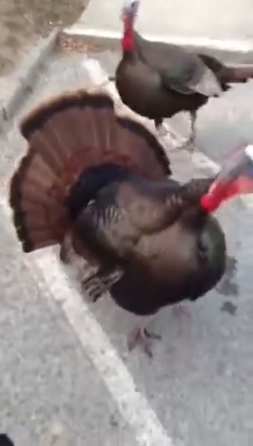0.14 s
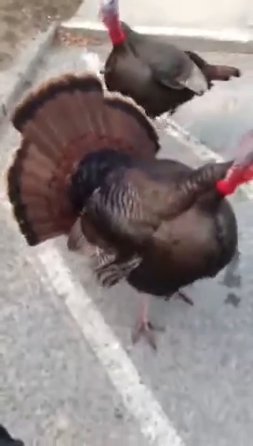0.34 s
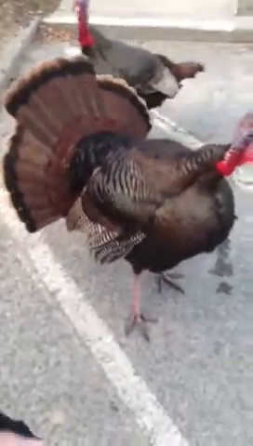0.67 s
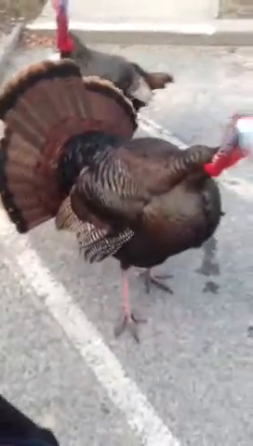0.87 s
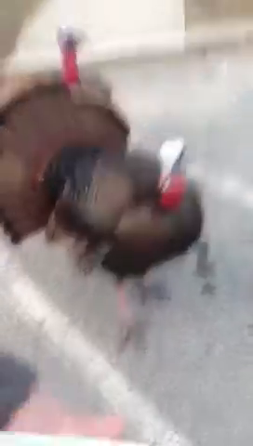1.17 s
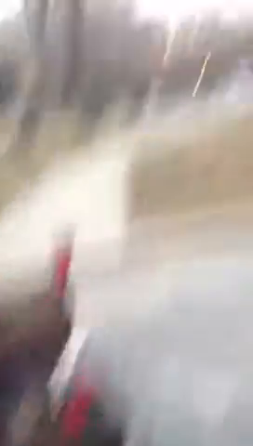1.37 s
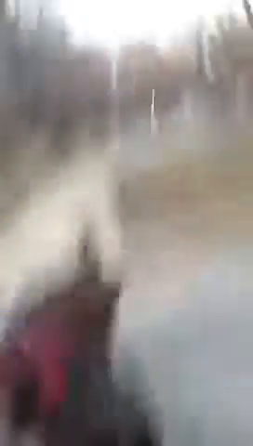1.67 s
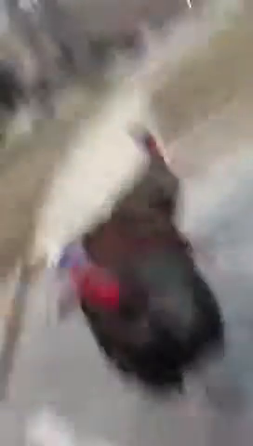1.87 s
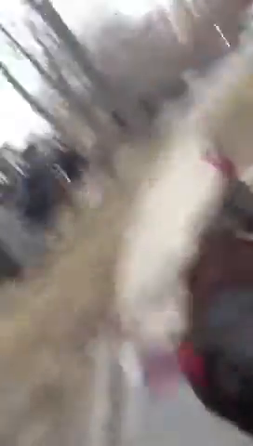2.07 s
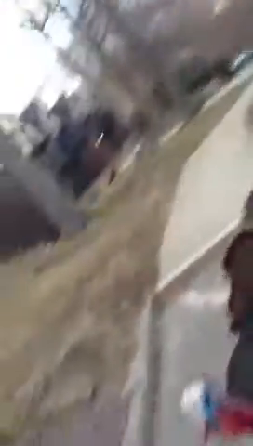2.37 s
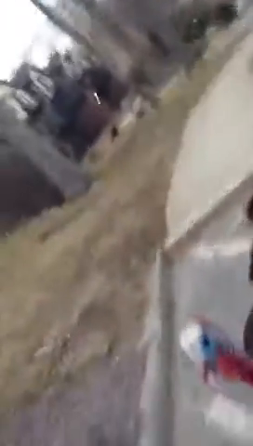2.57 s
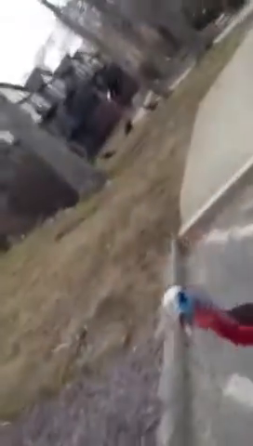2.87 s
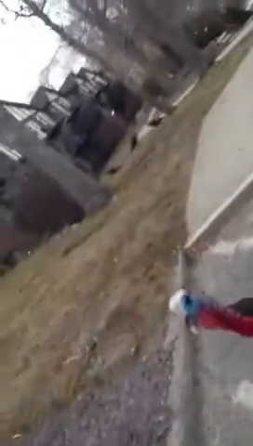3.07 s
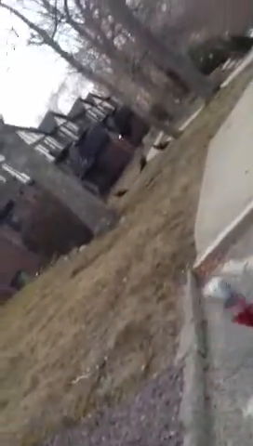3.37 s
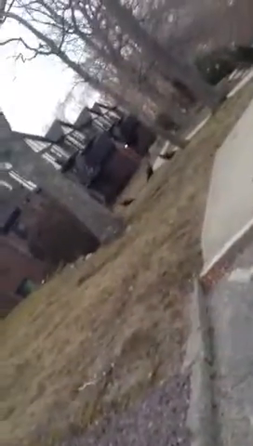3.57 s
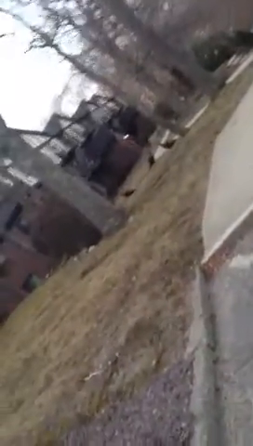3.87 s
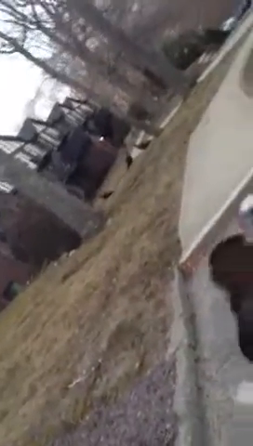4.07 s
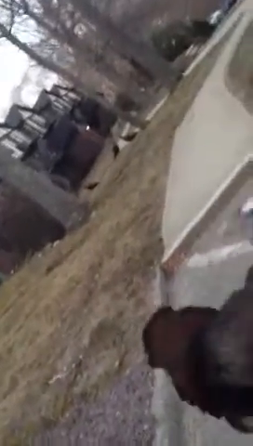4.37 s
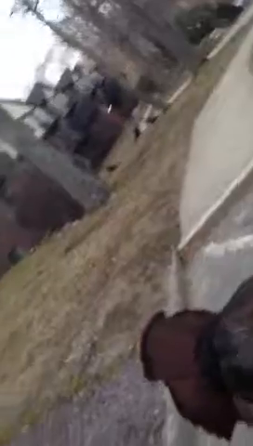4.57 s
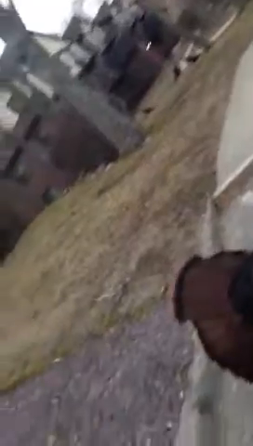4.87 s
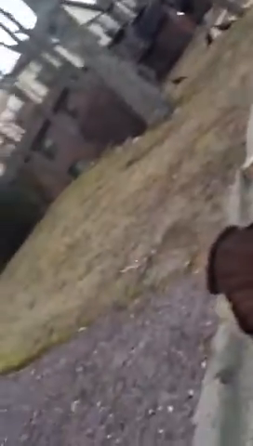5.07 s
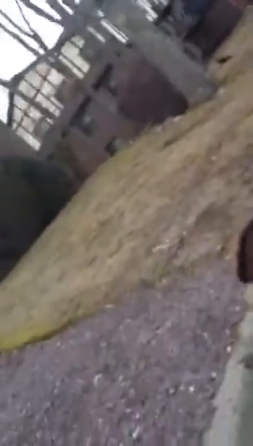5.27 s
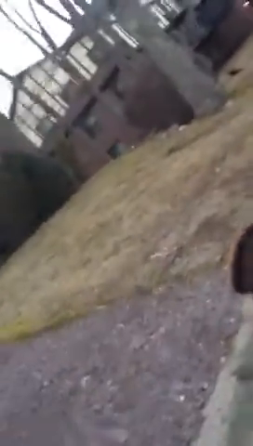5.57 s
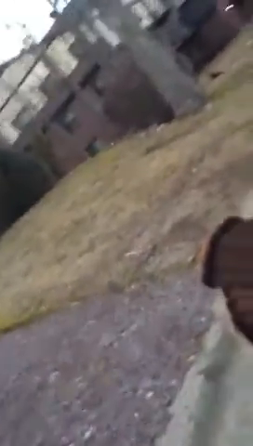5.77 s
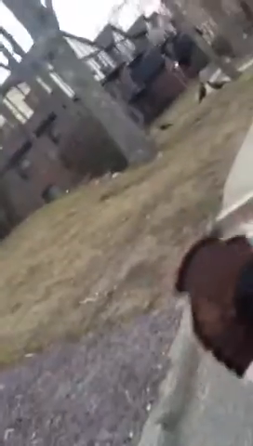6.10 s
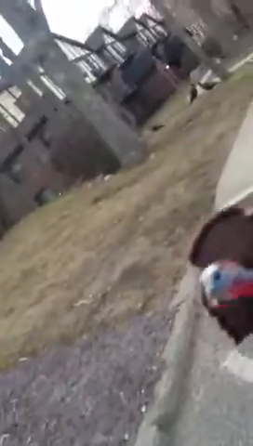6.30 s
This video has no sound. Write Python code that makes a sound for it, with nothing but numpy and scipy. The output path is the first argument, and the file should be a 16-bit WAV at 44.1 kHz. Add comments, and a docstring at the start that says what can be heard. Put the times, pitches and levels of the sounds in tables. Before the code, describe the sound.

Wild turkeys gobble four times close by, once with harsh squeals and barks, with soft feather rustling over a faint outdoor hum.

```python
"""A quiet car park, where wild turkeys gobble four times, the third time right beside the microphone.
A gobble is a whistle that breaks to a low tone, then a rattle of quick beats; the close one squeals
and barks. The voice is a source and a filter: membranes in the syrinx chop the airflow, and throat
resonances shape the overtones. Between gobbles come soft clucks, thin whines, rustling and a few taps
over a faint outdoor hum. The pavement and the surroundings return weak echoes."""
import sys
import numpy as np
from scipy import signal
from scipy.fft import rfft, irfft
from scipy.io import wavfile
from scipy.ndimage import uniform_filter1d, map_coordinates

SR = 44100
rng = np.random.default_rng(int(sys.argv[2]) if len(sys.argv) > 2 else 0)


def waveform_to_disk(signal):
    """Save audio, clipped to [-1, 1], as 16-bit WAV at the path in sys.argv[1]."""
    frames = np.transpose(np.atleast_2d(signal))
    scaled = np.clip(frames, -1, 1) * 32767
    samples = np.round(scaled).astype(np.int16)
    wavfile.write(sys.argv[1], SR, samples)


N = 284004
CUTOFF_HZ = 15500


def from_db(db):
    """Decibels to amplitude ratio."""
    return 10 ** (np.asarray(db) / 20)


def rms_one(x):
    """Normalisation to unit rms."""
    return x / np.sqrt(np.mean(x ** 2) + 1e-20)


def add(out, start_s, sound):
    """Superposition: a sound joins the mix at a given time."""
    i = max(round(start_s * SR), 0)
    out[i:i + len(sound)] += sound[:N - i]


def cut(x, hz, kind, order=2):
    """Butterworth filter."""
    return signal.sosfilt(signal.butter(order, np.clip(hz, 10, .45 * SR), kind, fs=SR, output="sos"), x)


def wobble(n, per_s):
    """Smooth random modulation with a spread of about 1."""
    knots = rng.standard_normal(4000)
    return map_coordinates(knots, [np.arange(n) * per_s / SR], order=2, mode="wrap")


def noise(spectrum):
    """Spectral shaping of white noise, at unit rms."""
    hz, db = np.transpose(spectrum)
    log_hz = np.log(np.fft.rfftfreq(N, 1 / SR) + 1)
    gain = from_db(np.interp(log_hz, np.log(hz), db))
    return rms_one(irfft(rfft(rng.standard_normal(N)) * gain, N))


def grit(per_s, band_hz):
    """Shot noise: sparse random impacts in one band, at unit rms."""
    impacts = (rng.random(N) < per_s / SR) * rng.standard_normal(N) + 1e-18
    return rms_one(cut(impacts, band_hz, "band"))


def gate(t, length, attack, release):
    """Raised-cosine envelope with ramps centred on time 0 and on the given length."""
    rise = np.clip(t / attack + .5, 0, 1)
    fall = np.clip((length - t) / release + .5, 0, 1)
    return np.sin(np.pi / 2 * rise * fall) ** 2


def car_park(x, ground_s=.0038, ground_db=-14, near_t60=0.15, far_t60=0.63):
    """Reflection: a bounce off the pavement, nearby scatter and a faint tail from houses and trees."""
    t = np.arange(SR) / SR
    near = cut(rng.standard_normal(SR), 4900, "low") * from_db(-60 * t / near_t60) * (t > .006)
    far = cut(rng.standard_normal(SR), 4500, "low") * from_db(-60 * t / far_t60) * (t > .03)
    response = 0.64 * (from_db(-21) * rms_one(near) + from_db(-33) * rms_one(far)) / np.sqrt(SR)
    response[round(ground_s * SR)] += from_db(ground_db)
    return x + signal.fftconvolve(x, response)[:N]


# spectrum of the distant hum: frequency_hz, density_db
HUM_SPECTRUM = [(18, -53.5), (30, -37), (187, -4.5), (341, -15.5), (399, -16), (656, -13), (787, -14),
                (1260, -29.5), (1590, -28.5), (1970, -23), (2690, -19), (2910, -23.5), (4310, -23),
                (9940, -28), (15500, -29.5)]
def outdoor_hum(level_db=-62.5):
    """Ambient noise: broadband, strongest in the bass, wavering slightly in level."""
    return from_db(level_db) * noise(HUM_SPECTRUM) * from_db(0.37 * wobble(N, 22))


# spectra of the rustle's three registers and of brushing feathers: frequency_hz, density_db
BASS_SPECTRUM = [(100, 1), (190, 5.5), (400, 10.5), (700, -4.5), (1100, 1), (2000, -98)]
MIDDLE_SPECTRUM = [(450, -31), (800, 7), (1100, 3), (1600, 4.5), (2300, 4), (3500, -42.5)]
TREBLE_SPECTRUM = [(1500, -30), (2600, 11.5), (4500, 8.5), (6200, 3.5), (8500, 0.5), (12000, -5),
                   (15500, -5.5)]
FEATHER_SPECTRUM = [(60, -37), (150, 5), (450, 8.5), (1400, 7.5), (2200, 5.5), (3500, 7), (6000, -0.5),
                    (9000, -13.5), (15000, -27)]
# rustle envelopes, one list for each spell: time_s, bass_db, middle_db, treble_db
RUSTLE_SPELLS = [
    [(0.45, -71.5, -84, -97), (0.62, -65.5, -67.5, -66), (0.77, -59, -65, -62.5), (0.85, -62.5, -64.5, -59),
     (1.16, -62.5, -64.5, -64), (1.3, -59.5, -59.5, -56), (1.42, -69, -68, -61.5), (1.65, -63.5, -64, -60),
     (1.89, -66, -70, -66.5), (2.19, -68.5, -68, -69.5), (2.48, -65.5, -69, -66.5)],
    [(2.86, -71, -87, -66.5), (2.992, -69.5, -67.5, -67.5), (3.212, -68, -62, -58.5),
     (3.364, -61.5, -53.5, -55), (3.492, -62, -49, -53), (3.578, -60.5, -56.5, -57),
     (3.744, -66, -58, -60.5), (3.974, -64, -64, -73), (4.164, -60.5, -57.5, -65), (4.35, -67, -60.5, -63),
     (4.57, -60.5, -87, -69)],
    [(5.41, -62, -54.5, -61), (5.498, -75, -58, -69.5), (5.696, -71.5, -68.5, -68),
     (5.852, -70, -68.5, -71), (6.03, -69, -73.5, -70.5)],
]
# strokes of feathers: start_s, length_s, level_db
FEATHER_STROKES = [(1.172, 0.08, -41.5), (1.317, 0.12, -57), (3.938, 0.13, -51), (4.704, 0.018, -36.5),
                   (5.738, 0.013, -45.5), (5.845, 0.008, -49), (6.308, 0.085, -55.5)]
def rustle(grain_db=2.93, still_db=(-70.5, -70.5, -70)):
    """Friction noise swells with movement and catches unevenly, with crackles and feather strokes."""
    out, t = np.zeros(N), np.arange(N) / SR
    catches = wobble(N, 71)
    spells = [np.transpose(rows) for rows in RUSTLE_SPELLS]
    envelopes = []
    for column, floor_db in enumerate(still_db, 1):
        level = sum(np.interp(t, spell[0], from_db(spell[column]), left=0, right=0) for spell in spells)
        # a register dies out as it sinks to its still level
        envelopes.append(np.sqrt(np.maximum(level ** 2 - from_db(floor_db) ** 2, 0)))
    bass, middle, treble = envelopes
    for level, spectrum in [(bass, BASS_SPECTRUM), (middle, MIDDLE_SPECTRUM), (treble, TREBLE_SPECTRUM)]:
        out += level * noise(spectrum) * from_db(grain_db * (0.16 * catches + 0.74 * wobble(N, 250)))
    out += middle * from_db(-2) * grit(per_s=60, band_hz=[750, 2200])
    strokes = sum(from_db(db) * gate(t - s, length, 0.057, 0.04) for s, length, db in FEATHER_STROKES)
    return out + strokes * noise(FEATHER_SPECTRUM) * from_db(grain_db * wobble(N, 300))


# faint, thin whistles: start_s, length_s, pitch_hz, level_db
THIN_WHISTLES = [(1.327, 0.088, 3900, -61.5), (1.43, 0.13, 3530, -66), (1.638, 0.074, 3840, -68),
                 (4.62, 0.034, 11990, -63.5), (4.64, 0.23, 10050, -72.5), (4.685, 0.04, 12800, -61.5)]
def whistles():
    """Nearly pure tones swell and fade at an almost steady pitch."""
    out = np.zeros(N)
    for s, length, hz, db in THIN_WHISTLES:
        n = round(length * SR)
        phase = 2 * np.pi * np.cumsum(hz * (1 + 0.0044 * wobble(n, 123))) / SR
        add(out, s, from_db(db) * rms_one(np.sin(phase) * np.hanning(n)))
    return out


# scrapes on the pavement: start_s, length_s, level_db
GRIT_SCRAPES = [(3.393, .18, -48), (3.726, 0.036, -50.5), (3.966, 0.05, -40), (4.319, 0.039, -51.5)]
def scrapes():
    """Granular friction: grit rolls and slips in a dense run of tiny clicks."""
    t = np.arange(N) / SR
    envelope = sum(from_db(db) * gate(t - s, length, .015, .025) for s, length, db in GRIT_SCRAPES)
    return envelope * grit(per_s=1200, band_hz=[430, 1800])


# soft low bumps: start_s, level_db
LOW_BUMPS = [(0.943, -39), (1.343, -37.5), (1.791, -30.5), (2.504, -35), (5.535, -45), (5.946, -33.5)]
def bumps(t60=0.012, rise_s=0.0012):
    """Heavy damping: a burst of low noise dies so fast that it is heard as a thud."""
    out, t = np.zeros(N), np.arange(4096) / SR
    for s, db in LOW_BUMPS:
        thud = rms_one(cut(rng.standard_normal(len(t)), [170, 420], "band"))
        add(out, s, thud * from_db(db - 60 * t / t60) * np.minimum(t / rise_s, 1))
    return out


# dull taps on the pavement and sharp ticks of grit: start_s, relative_level_db
DULL_TAPS = [(0.888, -44), (1.781, -38), (2.495, -40.5), (3.43, -42), (3.506, -31), (3.664, -39),
             (3.952, -27), (4.059, -42.5), (4.203, -41.5), (4.34, -36.5), (5.465, -35.5), (5.484, -41.5),
             (5.506, -38), (5.574, -41.5)]
GRIT_TICKS = [(0.8843, -30.5), (2.126, -41.5), (2.1833, -41), (2.2035, -42), (2.347, -36), (2.9134, -36),
              (4.695, -44)]
def taps(tap_db=-4, tap_t60=0.07, tick_db=-10, tick_t60=.03, crack_s=0.000087):
    """Impact noise: each contact begins with a brief crack and decays exponentially."""
    out, t = np.zeros(N), np.arange(8192) / SR
    crack = 1 + from_db(10) * np.exp(-t / crack_s)
    for s, db in DULL_TAPS:
        contact = rng.standard_normal(len(t)) * crack * from_db(db + tap_db - 60 * t / tap_t60)
        # the square roots restore the power lost outside each band
        thud = cut(contact, [450, 1300], "band") * np.sqrt(SR / 1700)
        scuff = cut(contact, [1500, 4500], "band") * np.sqrt(SR / 6000)
        add(out, s, thud + from_db(-12) * scuff)
    for s, db in GRIT_TICKS:
        contact = rng.standard_normal(len(t)) * crack * from_db(db + tick_db - 60 * t / tick_t60)
        add(out, s, cut(contact, [2000, 12000], "band", order=1))
    return out


# harmonics of a whine: harmonic_number, relative_level_db
WHINE_HARMONICS = [(1, 5.5), (2, 0.5), (3, -3), (4, -4), (5, -21)]
# thin whines, and at 3.715 s a higher scraping squeal voiced the same way: start_s, length_s, first_pitch_hz,
# last_pitch_hz, level_db
THIN_WHINES = [(2.922, 0.12, 1167, 1190, -59), (3.18, 0.081, 1180, 1128, -53),
               (3.701, 0.047, 1093, 1104, -53), (3.715, 0.032, 1604, 1643, -52),
               (4.227, 0.071, 1002, 1100, -47), (4.483, 0.11, 1140, 1034, -47.5),
               (4.78, 0.091, 1002, 1115, -44.5)]
def whines(hoarse_db=-7):
    """A harmonic series whose partials flutter independently; breath noise makes it slightly hoarse."""
    out = np.zeros(N)
    for s, length, first_hz, last_hz, db in THIN_WHINES:
        n = round(length * SR)
        pitch = np.linspace(first_hz, last_hz, n) * (1 + .022 * wobble(n, 1200))
        phase = 2 * np.pi * np.cumsum(pitch) / SR
        tone = sum(from_db(level_db) * np.sin(k * phase) * (1 + 0.8 * wobble(n, 350))
                   for k, level_db in WHINE_HARMONICS)
        air = rms_one(cut(rng.standard_normal(n), [900, 4000], "band"))
        call = rms_one(tone) + from_db(hoarse_db) * air
        add(out, s, from_db(db) * rms_one(call * np.hanning(n) ** 0.48))
    return out


# spectrum of the puff of air behind a note: frequency_hz, density_db
PUFF_SPECTRUM = [(20, -2.5), (90, -15.5), (170, 4.5), (270, -10.5), (450, -3.5), (800, -25.5)]
def puffs(voice, gain_db=-21):
    """Flow noise: each note pushes out a low puff that follows the envelope of its overtones."""
    power = uniform_filter1d(cut(voice, 2100, "high") ** 2, size=400)
    return from_db(gain_db) * np.sqrt(np.abs(power)) * noise(PUFF_SPECTRUM)


# throat resonances with the beak nearly shut and wide open: centre_hz, bandwidth_hz, gain_db
SHUT_FORMANTS = [(1745, 120, 10.5), (2350, 630, -2), (2970, 320, 1.5), (3970, 200, -6.5), (4260, 640, -1),
                 (6740, 2000, -11.5), (9900, 920, -9.5), (13000, 4000, -19.5)]
OPEN_FORMANTS = [(1968, 290, 2), (2336, 200, -3.5), (3200, 440, 2.5), (3574, 220, 0.5), (4560, 1900, -4),
                 (5340, 360, -5), (6600, 380, -7), (7670, 510, -12), (9900, 3300, -17),
                 (13500, 1200, -30.5)]
def throat(x, tilt_db, opening):
    """Parallel resonators, blended by beak opening and tilted by tilt_db per octave above 3500 Hz."""
    out = 0
    for formants, share in [(SHUT_FORMANTS, 1 - opening), (OPEN_FORMANTS, opening)]:
        for hz, width, db in formants:
            gain = share * from_db(db + tilt_db * np.log2(max(hz / 3500, 1)))
            out += gain * cut(x, [hz - width / 2, hz + width / 2], "band")
    return out


LEAD_S = .02   # room for the attack ahead of each note
def syrinx(length, glide_hz, db, octave_db, overtones_db, tilt_db, rasp,
           jitter=0.074, croak_db=-10, attack=.96, grow_db=0):
    """A flow-driven valve glides through three pitches; rasp (0-1) unsettles it and lets air hiss."""
    n, rasp = 4096, np.clip(rasp, 0, 1)
    t = np.arange(n) / SR - LEAD_S
    pitch = np.interp(t, [0, length / 2, length], glide_hz)
    pitch *= 1 + (0.015 + jitter * rasp) * wobble(n, 900.3)
    phase = 2 * np.pi * np.cumsum(pitch) / SR
    tone = np.sin(phase) * (1 + .4 * rasp * wobble(n, 500))
    tone += from_db(octave_db) * np.sin(2 * phase) * (1 + .4 * rasp * wobble(n, 682))
    # irregular cycles fill the low windpipe band with a croak
    tone += from_db(croak_db) * rasp * rms_one(cut(rng.standard_normal(n), [500, 1550], "band", order=4))
    # the membranes slap shut once a cycle, which gives the overtones
    slaps = rms_one(sum(np.cos(k * phase) * k ** -.6 * (k * pitch < CUTOFF_HZ) for k in range(3, 26)))
    air = (0.25 + 0.7 * rasp ** 2) * rng.standard_normal(n) * (1 + 0.26 * np.cos(phase))
    # in a rasping note the flow rattles every few cycles
    rattle_hz = 175 * (1 + 0.33 * wobble(n, 192))
    rattle_db = 6 * rasp * np.cos(2 * np.pi * np.cumsum(rattle_hz) / SR)
    ramp_s = min(length, .02)
    valve = np.clip((t + 0.00042) / 0.0033, 0, 1)
    build_up = np.clip((t + .002) / (.35 * length + .002), 0, 1)
    push = gate(t, length, 1.8 * ramp_s, 1.6 * ramp_s) * from_db(rattle_db) * valve * build_up
    beak_opening = np.clip((overtones_db + 18.5) / 9, 0, 1)
    overtones = throat((slaps + air) * push, tilt_db, beak_opening)
    overtones /= np.sqrt(np.sum(overtones ** 2) / (length * SR))
    # brief notes pop open, long ones swell
    swell = gate(t, length, attack * ramp_s, 0.01) * np.sqrt(valve)
    swell *= from_db(grow_db * np.clip(t / length - .5, -1, 1))
    tone = np.sqrt(2) * cut(tone * swell, 300, "high", order=3)
    return from_db(db) * (tone + from_db(overtones_db) * overtones)


# soft clucks: start_s, pitch_hz, level_db
SOFT_CLUCKS = [(0.688, 983, -44.5), (0.733, 742, -48.5), (0.775, 686, -37)]
def clucks(length_s=0.0122):
    """Short tone bursts of the syrinx drop quickly on to their pitch."""
    out = np.zeros(N)
    for s, hz, db in SOFT_CLUCKS:
        glide = hz * np.array([1.38, 0.96, 0.97])
        cluck = syrinx(length_s, glide, db, octave_db=-23, overtones_db=-19, tilt_db=-12, rasp=0.44)
        add(out, s - LEAD_S, cluck)
    return out


# openings of the gobbles: break_s, hold_s, whistle_db, low_tone_db, lift_db, overtones_re_tone_db
GOBBLE_OPENINGS = [(0.07, 0.027, -35.5, -24, -37, -19.5), (2.539, 0.025, -35.5, -27, -36.5, -28.5),
                   (4.606, 0.034, -35, -35.5, -25.5, -15), (6.066, 0.03, -39, -24.5, -41.5, -28)]
def openings(whistle_s=0.019, lift_s=0.024):
    """A register break: a whistle jumps down to a held low tone, which then lifts again."""
    out = np.zeros(N)
    for s, hold_s, whistle_db, low_db, lift_db, overtones_db in GOBBLE_OPENINGS:
        whistle = syrinx(whistle_s, (1040, 1034, 890), whistle_db, octave_db=-22, overtones_db=-24,
                         tilt_db=-2.5, rasp=.17, grow_db=11.5)
        low = syrinx(hold_s, (721, 561.5, 670), low_db, octave_db=-19.5, overtones_db=overtones_db,
                     tilt_db=2, rasp=0.098, attack=0.33)
        lift = syrinx(lift_s, (800, 805, 987), lift_db, octave_db=-32, overtones_db=-29.5,
                      tilt_db=4, rasp=0.1, croak_db=-6.5, grow_db=-13.5)
        add(out, s - whistle_s - LEAD_S, whistle)
        add(out, s - LEAD_S, low)
        add(out, s + hold_s - LEAD_S, lift)
    return out


# modes of the windpipe: frequency_hz, relative_level_db, t60_s
WINDPIPE_MODES = [(1150, -11, 0.029), (1413, -16, 0.027)]
def windpipe_pop(hz, db, pitch_t60=0.019, rise_s=0.0013):
    """Free decay: a knocked air column rings at the given pitch and in its own modes."""
    t = np.arange(2048) / SR
    ringing = sum(from_db(db + mode_db - 60 * t / t60) * np.sin(2 * np.pi * mode_hz * t)
                  for mode_hz, mode_db, t60 in [(hz, 0, pitch_t60)] + WINDPIPE_MODES)
    onset = 1 - np.exp(-(t / rise_s) ** 2)
    return cut(2 * ringing * onset, [450, 1650], "band", order=3)


# the two knocks of each flick: delay_s, relative_level_db, pitch_ratio
FLICK_KNOCKS = [(.0008, 4, 0.999), (.005, -8, 1.206)]
# five beats a rattle, about 24 a second: flick_start_s, hum_s, pitch_hz, level_db, relative_overtones_db
RATTLE_BEATS = [(0.161, 0.011, 803, -17, -23), (0.203, 0.0078, 799, -20, -26.5), (0.245, 0, 860, -27, -34),
                (0.286, 0.0047, 800, -18, -22.5), (0.326, 0, 1024, -41.5, -43),
                (2.634, 0.016, 792, -17, -24.5), (2.678, 0.0079, 822, -17.5, -27),
                (2.722, 0, 912, -23, -37), (2.763, 0.0017, 834, -19, -32.5), (2.805, 0, 1007, -28.5, -34),
                (6.151, 0.0083, 720, -19, -32.5), (6.195, 0.011, 678, -20, -31),
                (6.235, .007, 702, -21, -29), (6.276, 0.0047, 719, -21.5, -30.5),
                (6.316, 0.00097, 676.6, -21, -23.5)]
def rattles(flick_s=0.0078, rise_ratio=1.16, shut_s=0.00138):
    """Pulsed excitation: upward flicks, most of them after a brief hum, knock the windpipe."""
    out = np.zeros(N)
    for s, hum_s, hz, db, overtones_db in RATTLE_BEATS:
        if hum_s > 0:
            hum = syrinx(hum_s, (745.7, 611, 623), db - 3, octave_db=overtones_db + 11,
                         overtones_db=overtones_db + 0.5, tilt_db=1, rasp=0.11, grow_db=3.5)
            add(out, s - hum_s - shut_s - LEAD_S, hum)   # the valve shuts briefly before the flick
        glide = [hz / rise_ratio, hz, hz * rise_ratio]
        flick = syrinx(flick_s, glide, db - 8, octave_db=-23, overtones_db=overtones_db + 8,
                       tilt_db=-6.5, rasp=0)
        add(out, s - LEAD_S, flick)
        for delay_s, knock_db, ratio in FLICK_KNOCKS:
            add(out, s + delay_s, windpipe_pop(hz * ratio, db + knock_db))
    return out


# high, falling squeals: start_s, length_s, pitch_hz, level_db
CLOSE_SQUEALS = [(4.908, 0.014, 1157, -29.5), (4.956, 0.026, 940, -29.5), (4.991, 0.019, 1178, -14.5),
                 (5.118, 0.019, 1035, -25), (5.166, 0.0118, 938, -29.5), (5.351, .019, 1047, -26.5)]
# low barks: start_s, length_s, first_pitch_hz, last_pitch_hz, level_db,
# octave_re_tone_db, overtones_re_tone_db, rasp_fraction
CLOSE_BARKS = [(4.661, 0.022, 653, 640, -31.5, -7, -14.5, 0.74),
               (4.726, 0.032, 664.5, 742, -24.5, -4.5, -15, 1), (4.757, 0.026, 630, 597, -34, 1, -20, 1),
               (4.832, 0.023, 716, 751, -18.5, 3.5, -6.5, 0.75),
               (4.844, 0.029, 894, 757, -13, -21.5, -10, .95),
               (4.869, 0.023, 673, 553, -28.5, -7, -11.5, 0.6),
               (4.918, .02, 703, 571, -18.5, -18.5, -8.5, 0.8),
               (4.971, 0.019, 692, 696, -15, -11.5, -9.5, 0.7),
               (5.007, .018, 728.5, 595.5, -14.5, -3.5, -6, 0.07),
               (5.016, .033, 592, 618.4, -24.5, 10, -0.5, 0),
               (5.042, .023, 665.6, 738, -14, -16, -7.5, 0.4), (5.061, .019, 629, 522, -29.5, 9.5, 1, .75),
               (5.128, .018, 631.7, 558, -23, -11.5, -14.5, 0.8),
               (5.144, 0.029, 578, 620, -36.5, -6, -5, 0), (5.28, 0.05, 618, 581, -27, -10, -8.5, 0.73)]
def close_gobble(fall_ratio=1.07, loud_db=-14, tilt_per_db=1.06):
    """Two registers alternate, squeal and bark; spectral tilt follows level, so louder is brighter."""
    out = np.zeros(N)
    for s, length, hz, db in CLOSE_SQUEALS:
        glide = [hz * fall_ratio, hz, hz / fall_ratio]
        tilt_db = -0.5 + tilt_per_db * (db - loud_db)
        squeal = syrinx(length, glide, db, octave_db=-7, overtones_db=-7.5, tilt_db=tilt_db,
                        rasp=.55, grow_db=6)
        add(out, s - LEAD_S, squeal)
    for s, length, first_hz, last_hz, db, octave_db, overtones_db, rasp in CLOSE_BARKS:
        glide = [first_hz, (first_hz + last_hz) / 2, last_hz]
        tilt_db = 1 + tilt_per_db * (db - loud_db)
        bark = syrinx(length, glide, db, octave_db, overtones_db, tilt_db, rasp, jitter=.06)
        add(out, s - LEAD_S, bark)
    return out


def scene():
    """Superposition: calls and contacts with their echoes, over the rustle and the distant hum."""
    voice = openings() + rattles() + close_gobble() + clucks()
    breath = puffs(voice)
    hum = outdoor_hum()
    direct = voice + breath + whines() + whistles() + taps() + scrapes() + bumps()
    return (car_park(direct) + rustle() + hum)[None]


def record(dry):
    """Band limiting: the small microphone loses the deep bass, and the top is cut steeply."""
    thin = cut(dry, 100, "high")
    return signal.sosfilt(signal.ellip(10, .2, 80, CUTOFF_HZ, fs=SR, output="sos"), thin)


dry = scene()
out = record(dry)
waveform_to_disk(out)
```